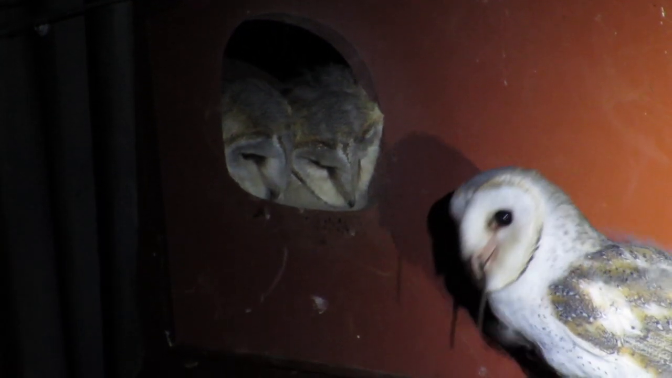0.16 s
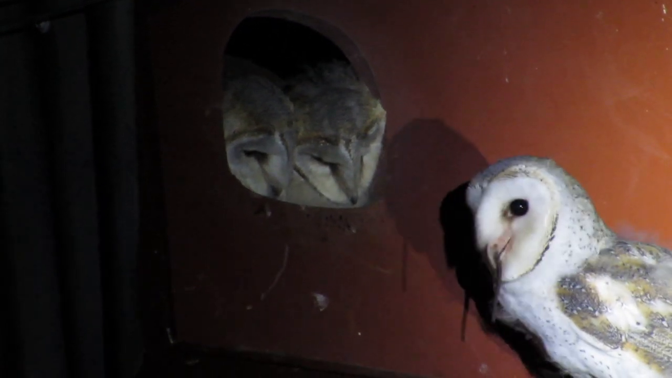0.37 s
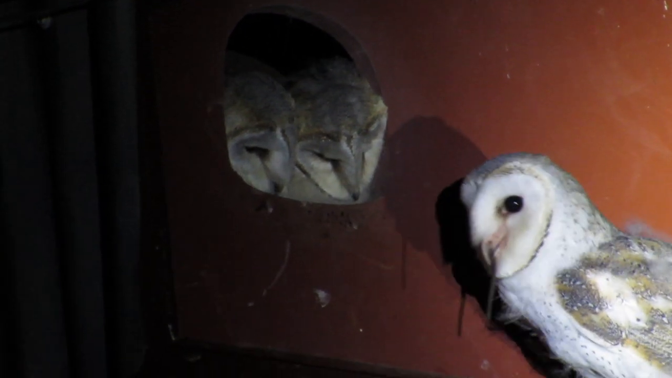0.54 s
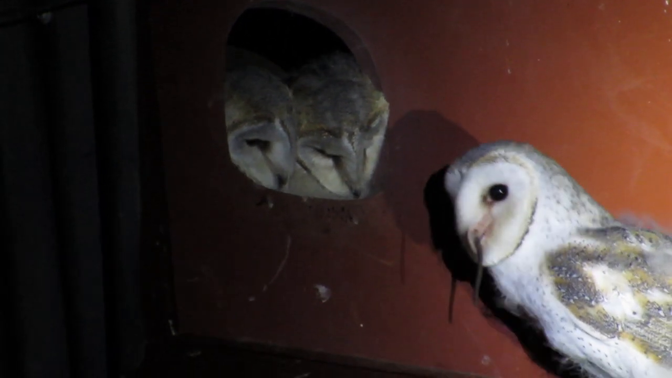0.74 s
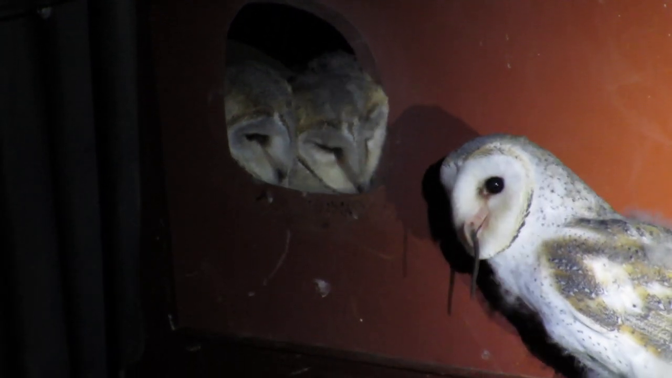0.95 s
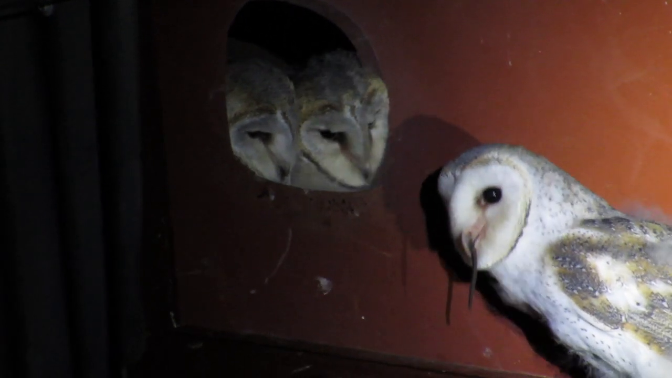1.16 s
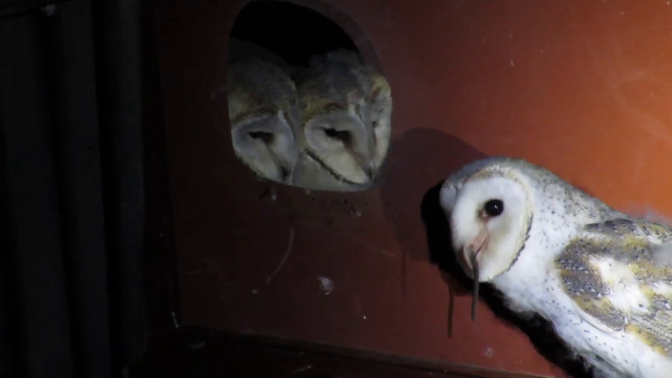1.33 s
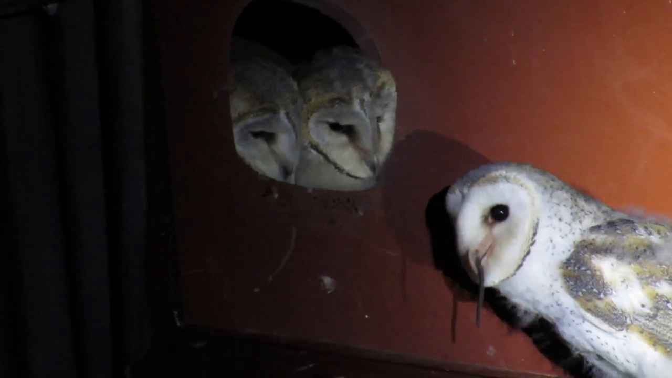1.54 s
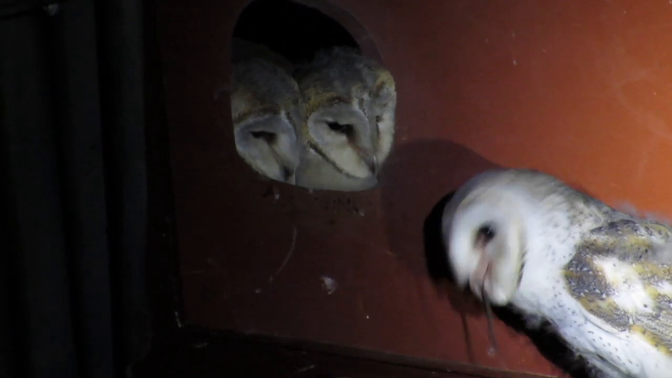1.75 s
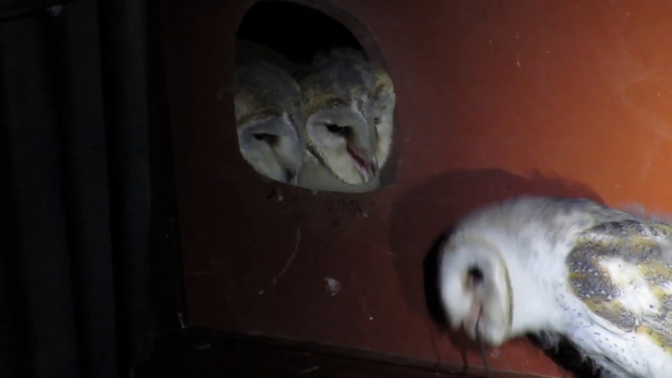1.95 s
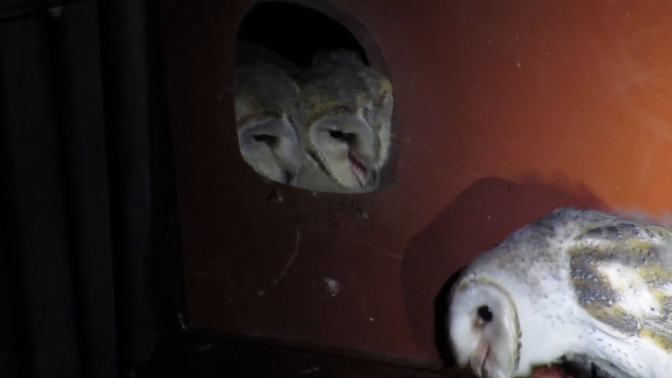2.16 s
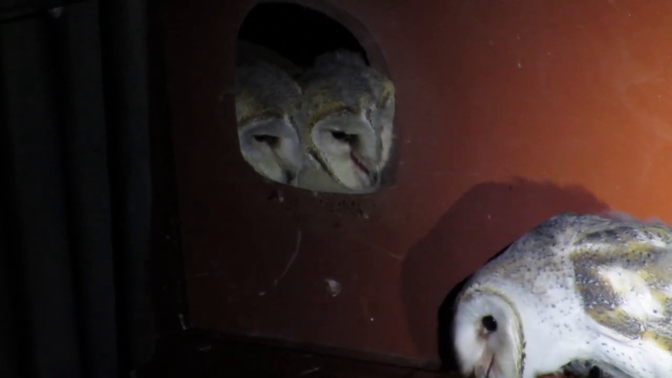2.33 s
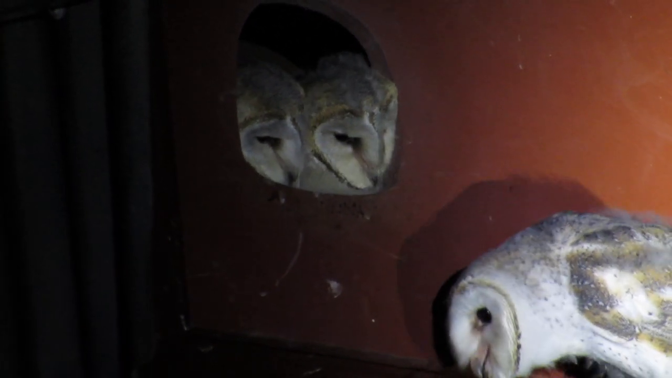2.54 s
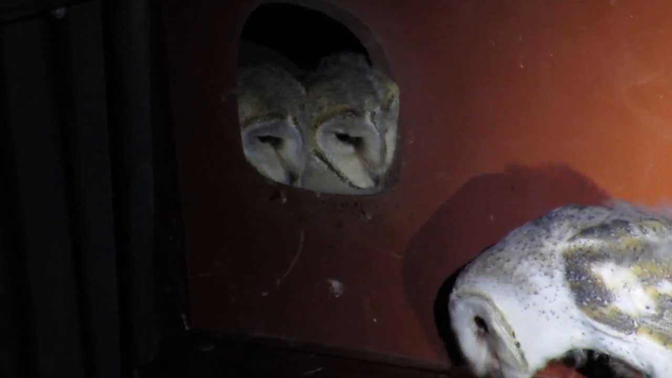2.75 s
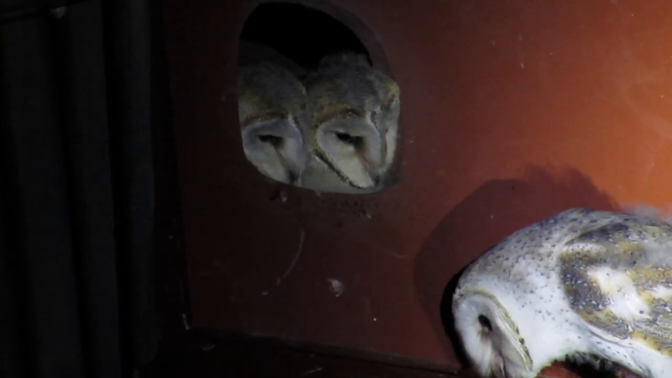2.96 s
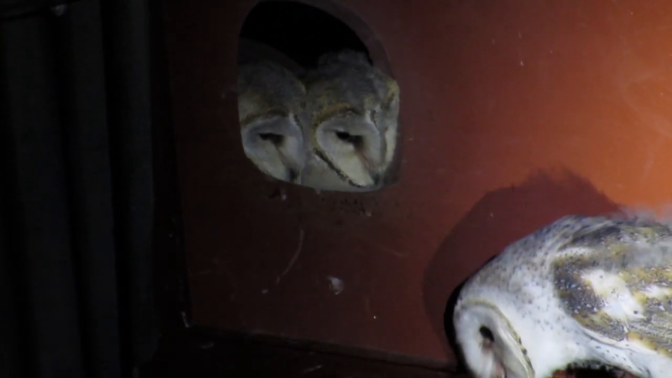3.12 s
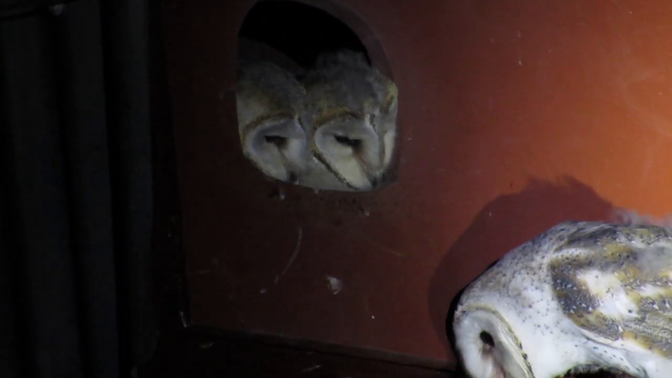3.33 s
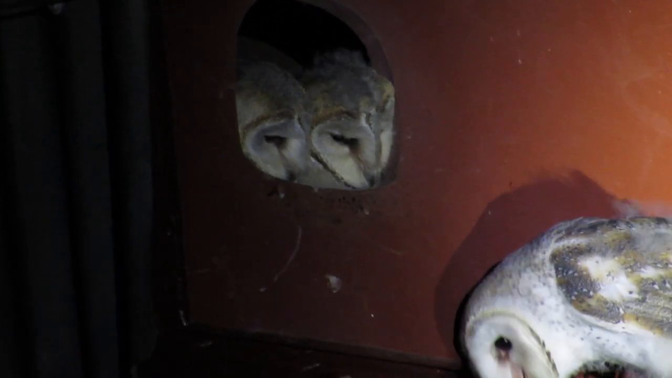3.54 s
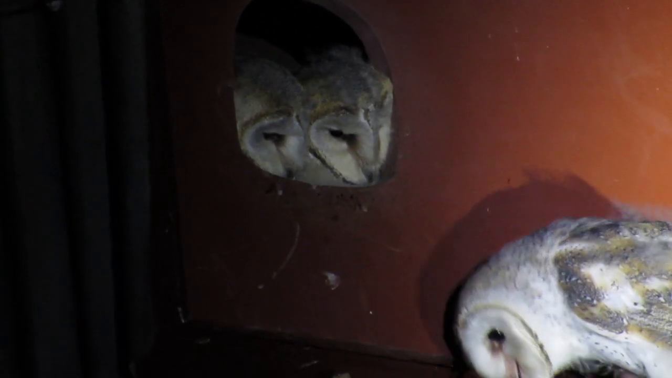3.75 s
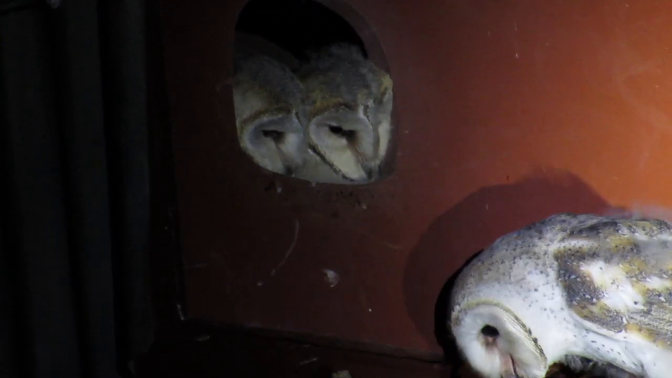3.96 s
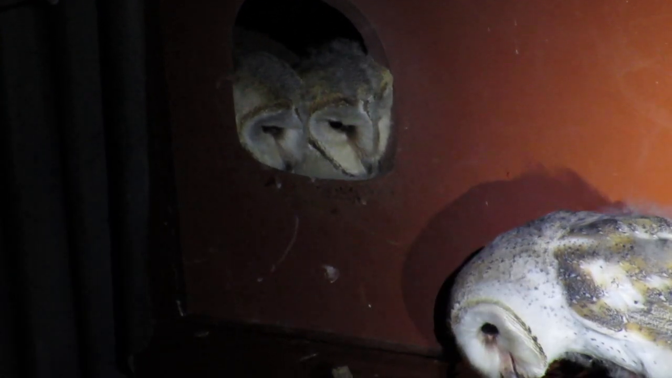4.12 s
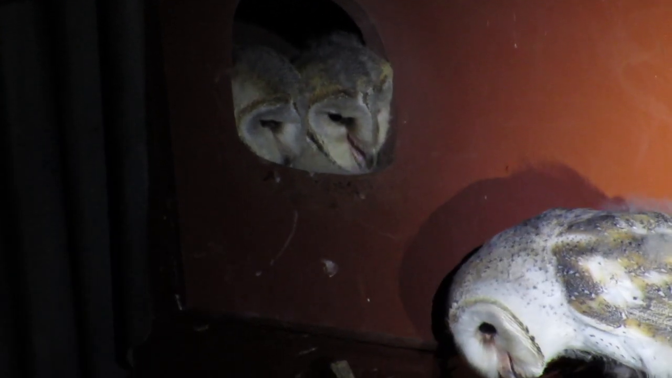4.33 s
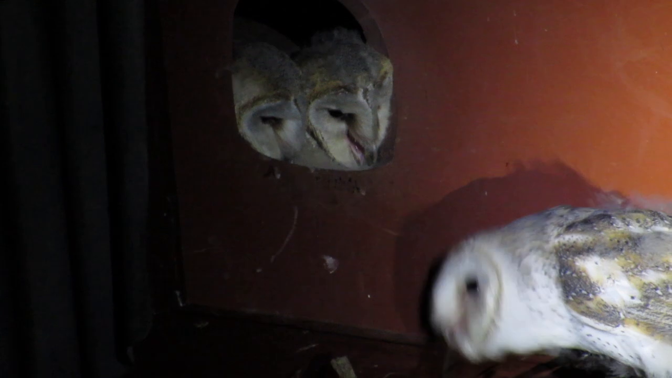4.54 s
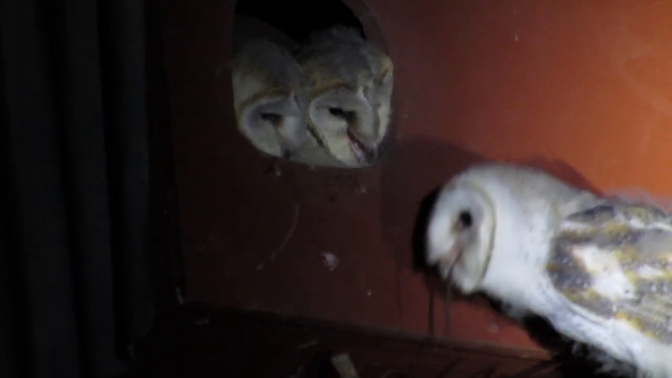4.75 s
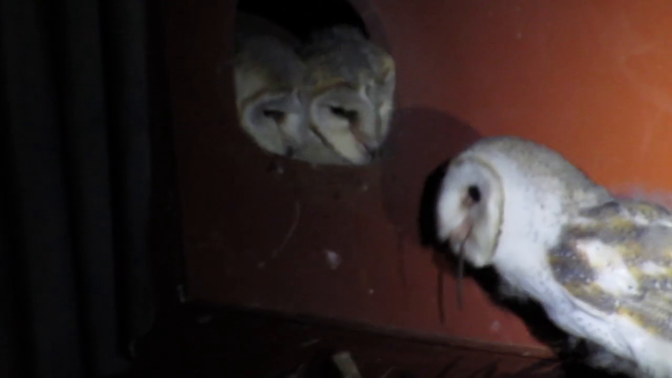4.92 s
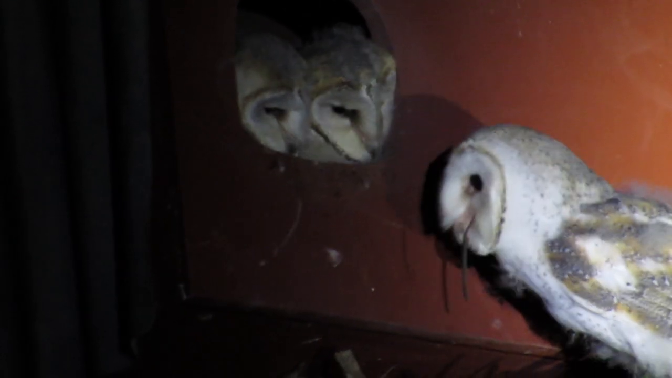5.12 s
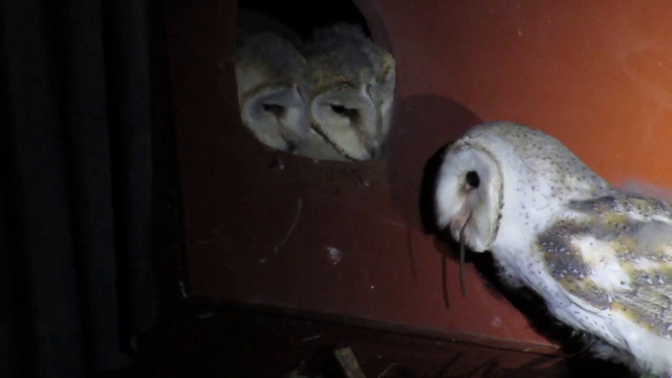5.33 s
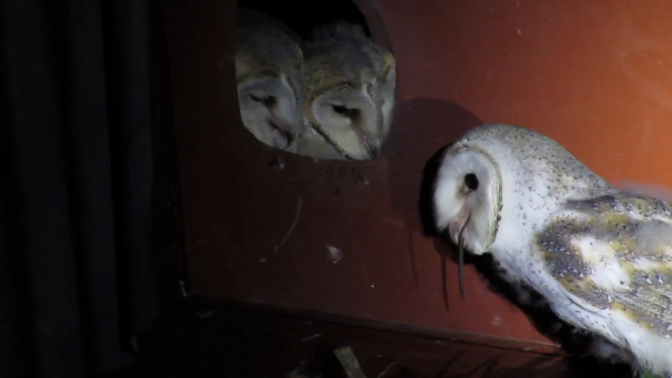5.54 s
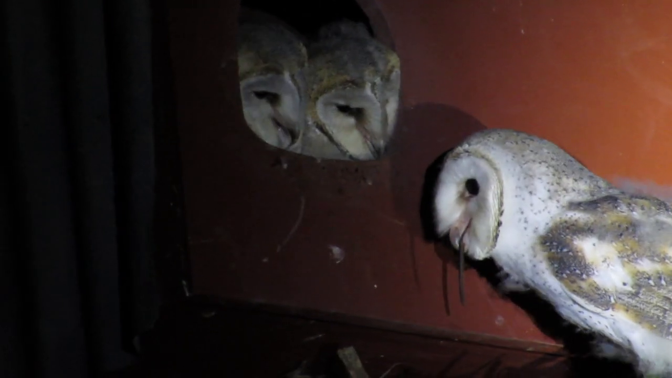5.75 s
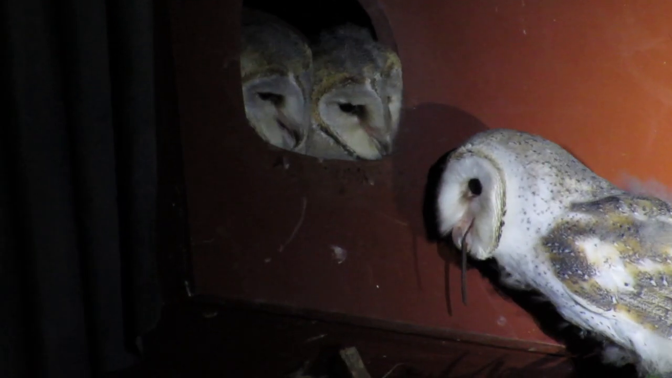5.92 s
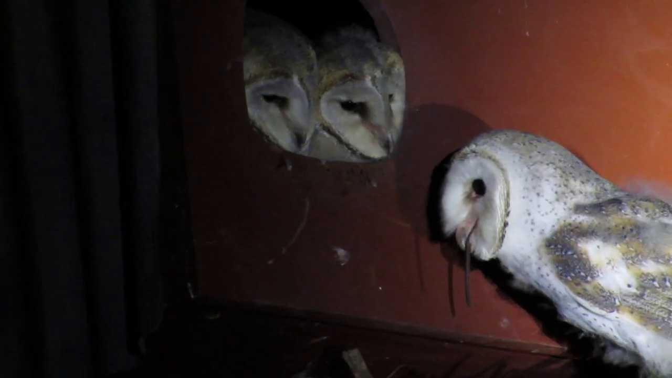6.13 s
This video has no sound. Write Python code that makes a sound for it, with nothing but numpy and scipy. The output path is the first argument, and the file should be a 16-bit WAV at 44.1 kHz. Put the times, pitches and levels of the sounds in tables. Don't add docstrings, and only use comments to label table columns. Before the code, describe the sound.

Two raspy, breathy owl screeches swell and cut off over trilling crickets, with soft wind bumps and small claw ticks on wood.

```python
import sys
import numpy as np
from scipy import signal
from scipy.fft import rfft, irfft
from scipy.io import wavfile
from scipy.ndimage import uniform_filter1d

SR = 44100
rng = np.random.default_rng(int(sys.argv[2]) if len(sys.argv) > 2 else 0)


def digitize_waveform(pressure):
    field = np.atleast_2d(pressure).T
    bounded = np.clip(field, -1, 1)
    quanta = np.round(bounded * 32767).astype(np.int16)
    wavfile.write(sys.argv[1], SR, quanta)


def makeup_ratio(level_db):
    decades = np.asarray(level_db, float) / 20
    return 10 ** decades


N = 276948

# time in seconds, effort in dB, mouth opening from 0 to 1.
SCREECH = [
    (4.312, -65, 0),
    (4.326, -45, 0.06),
    (4.39, -36.5, 0.35),
    (4.49, -30, 0.58),
    (4.62, -25.5, 0.98),
    (4.79, -24, 1.0),
    (4.919, -26, 0.94),
    (5.026, -34, .92),
    (5.073, -59, 0.3),
]
# frequency in Hz, side minus mid in dB.
OWL_SIDE = [(60, 8), (99, -1), (160, -16), (270, 10), (450, 2.5), (740, -2), (1220, -2), (2010, 1.5),
            (3330, -12.5), (5500, -10.5), (9080, -6), (15000, -5)]
FULL_DB = -23.5


def evened(x):
    return x / np.sqrt(np.mean(x ** 2) + 1e-20)


def read(points, hz):
    f, value = np.transpose(points)
    return np.interp(np.log(hz + 1), np.log(f + 1), value)


def add(mix, s, sound):
    at = round(s * SR)
    sound = sound[:, max(-at, 0):]
    part = mix[:, max(at, 0):][:, :sound.shape[1]]
    part += sound[:, :part.shape[1]]


def stereo(mid, side):
    return np.array([mid + side, mid - side])


def noise(gain, size):
    z = rng.standard_normal(gain.shape[::-1] + (2,)).T
    return signal.istft(gain * (z[0] + 1j * z[1]), nperseg=size, noverlap=size * 3 // 4)[1]


def peak(hz, centre_hz, width, db, steep):
    return makeup_ratio(db) ** 2 / (1 + (2 * (hz - centre_hz) / width) ** 2) ** steep


def echoes(x, t60, wet_db, gap=.002):
    t = np.arange(6000) / SR
    signs = rng.choice([-1., 1.], (len(x), 6000))
    taps = signs * (rng.random((len(x), 6000)) < 1 / 20) * (t > gap)
    taps = taps * makeup_ratio(-60 * t / t60)
    taps = makeup_ratio(wet_db) * taps / np.linalg.norm(taps, axis=1, keepdims=True)
    return x + signal.oaconvolve(x, taps, axes=1)[:, :x.shape[1]]


def night():
    # frequency in Hz, density in dB per Hz.
    mid_tone = [(22, -36), (42, -5.5), (66, 9), (110, -5), (300, -12.5), (1080, -24), (3050, -27),
                (3620, -15.5), (4370, -23), (6030, -31.5), (7090, -31), (9790, -16), (11600, -31),
                (13200, -22.5), (15500, -31.5)]
    side_tone = [(15, -37), (69, -4.5), (500, -14), (3050, -23.5), (3620, 6.5), (4350, -47), (5130, -22),
                 (6300, -26), (7800, -11.5), (9270, -28.5), (10900, -11), (13200, -22.5), (14000, -41),
                 (15000, -22)]
    mid_db, side_db = -65, -63
    frames, hz = N // 256 + 5, np.fft.rfftfreq(1024, 1 / SR)[:, None]
    swell = evened(uniform_filter1d(rng.standard_normal(frames), 14))
    gusts_db = 3.5 * swell * np.clip(1 - hz / 150, 0, 1)
    mid = evened(noise(makeup_ratio(read(mid_tone, hz) + gusts_db), size=1024)[:N])
    side = evened(noise(makeup_ratio(read(side_tone, hz) + gusts_db), size=1024)[:N])
    return stereo(makeup_ratio(mid_db) * mid, makeup_ratio(side_db) * side)


def chorus():
    # pitch in Hz, pitch spread in Hz, chirps per second, mid in dB, side in dB.
    far_groups = [(3674, 204, 28, -73.5, -71), (5096, 210, 12, -85.5, -85), (7650, 120, 32, -99, -87.5)]
    # start in seconds, end in seconds, level in dB.
    group_bouts = [
        (0.027, 0.36, 3.5),
        (0.553, 0.863, 3),
        (1.1, 1.298, 1.5),
        (2.48, 3.55, 2.5),
        (3.64, 3.85, 1),
        (4.038, 4.3, 4.5),
        (5.08, 5.287, 7),
        (5.444, 5.858, 3),
        (5.88, 6.08, -0.5),
        (6.18, 6.3, 4),
    ]
    rest_db, bout_edge_s = -5, .055
    groups = []
    for hz, spread, rate, mid_db, side_db in far_groups:
        song, u = np.zeros((2, N)), np.linspace(0, 1, round(.7 * SR / rate))
        for k, (pace, first, tune, phase, breath) in enumerate(rng.uniform(-1.2, 1, (16, 5))):
            pitch = hz + spread * tune - 300 * (u - .5)
            chirp = np.sin(np.pi * u) * np.sin(2 * np.pi * np.cumsum(pitch) / SR)
            starts = np.arange(first, N / SR, 1 / rate / (1 + 0.07 * pace))
            swells = 0.4 + 0.53 * np.sin(2 * np.pi * ((1.2 + 0.43 * breath) * starts + phase))
            for s, level, late in zip(starts, np.maximum(swells, 0), rng.random(400) / 500):
                add(song[k % 2:k % 2 + 1], s + late, level * chirp[None])
        groups.append(stereo(makeup_ratio(mid_db) * evened(song[0]), makeup_ratio(side_db) * evened(song[1])))
    t = np.arange(N) / SR
    db = rest_db + sum((bout_db - rest_db) * (t > start) * (t < end) for start, end, bout_db in group_bouts)
    swell = makeup_ratio(uniform_filter1d(db, round(bout_edge_s * SR)))
    return echoes(groups[0] + swell * groups[1] + groups[2], 0.17, 1.33)


def trills(rows, gap_s, ms, pan_db, per_lead):
    settle_strokes, spread_db, jitter_s = .9, 0.6, .001
    strokes = []
    for first, last, open_db, full_db, lead in rows:
        count = round((last - first) / gap_s) + 1
        db = full_db + (open_db - full_db) * np.exp(-np.arange(count) / settle_strokes)
        late, loud = rng.standard_normal((count, 2)).T
        s = np.linspace(first, last, count) + jitter_s * late
        pan = pan_db + per_lead * lead ** 2
        strokes += [(a, b, ms, pan, lead) for a, b in zip(s, db + spread_db * loud)]
    return strokes


def wing_strokes(rows, top_hz, fall_hz, stretch, octave_db):
    rise_hz_per_ms, sag_bend, edge = 8.4, 2.256, 0.65
    out, chance = np.zeros((2, N)), rng.random((len(rows), 3))
    for (s, db, ms, pan_db, lead), (detune, phase, ripple) in zip(rows, chance):
        u = np.linspace(0, 1, round(stretch * ms * SR / 1000))
        start_hz = top_hz * (1 + .005 * (detune - .5)) + rise_hz_per_ms * (ms - 22)
        pitch = start_hz - fall_hz * ms / 22 * u ** sag_bend
        turn = 2 * np.pi * (np.cumsum(pitch) / SR + phase)
        ahead = np.array([[lead / 2], [-lead / 2]])
        shape = np.sin(np.pi * u) ** edge * (1 + .2 * np.sin(2 * np.pi * (2.5 * u + ripple)))
        to_each = makeup_ratio(db + 3 + np.array([[pan_db / 2], [-pan_db / 2]])) / max(np.cos(lead / 2), .45)
        octave = makeup_ratio(octave_db - (db + 68.0) / 2) * np.sin(2 * turn + ahead)
        add(out, s - len(u) / SR / 2, to_each * shape * (np.sin(turn + ahead) + octave))
    return out


def near_crickets():
    # first stroke in seconds, last stroke in seconds,
    # opening level in dB, full level in dB, left lead in radians.
    fast_trills = [
        (0.019, 0.307, -53.5, -53.5, -1.4),
        (0.555, 0.878, -60, -54, -1.5),
        (1.649, 1.684, -56.5, -51, -1.0),
        (2.424, 2.537, -48, -51.5, -1.5),
        (2.726, 3.111, -53, -51.5, -1.66),
        (3.314, 3.636, -56.5, -55.5, -2),
        (5.047, 5.227, -46, -48, 1.05),
        (5.271, 5.271, -48.5, -50, 1.3),
        (5.467, 5.895, -55, -48.5, 0.6),
        (6.099, 6.275, -50, -47.5, -0.2),
    ]
    slow_trills = [
        (1.18, 1.585, -59, -54.5, -1.1),
        (4.048, 4.334, -61, -52.5, -2),
    ]
    far_trills = [
        (0.321, 0.537, -63.5, -64.5, -2),
        (1.041, 1.4, -66, -62.5, -2.3),
        (2.566, 2.673, -66, -58.5, -2.0),
        (3.146, 3.184, -62.5, -59, -2),
        (3.665, 3.855, -58, -59.5, 1.1),
        (5.319, 5.434, -67, -72, -0.5),
        (5.962, 6.039, -63, -69, -1.5),
    ]
    deep_trills = [
        (0.54, 0.61, -68, -69, 2.4),
        (5.232, 5.415, -64, -75, 3.1),
    ]
    # start in seconds, level in dB, left lead in radians.
    high_phrases = [
        (0.402, -61, 0.77),
        (1.515, -60, .95),
        (2.615, -65, 1.45),
    ]
    phrase_s = (0, 0.097, .355)
    fast_gap_s, slow_gap_s = .0358, .069
    fast_ms, slow_ms, far_ms, high_ms = 22, 31, 18, 33
    near_pan_db, pan_per_lead = 2, -0.37
    low = trills(fast_trills, fast_gap_s, fast_ms, near_pan_db, pan_per_lead)
    low += trills(far_trills, fast_gap_s, far_ms, -2.5, 0)
    low += trills(slow_trills, slow_gap_s, slow_ms, near_pan_db, pan_per_lead)
    deep = trills(deep_trills, fast_gap_s, far_ms, 1.0, 0)
    high = [(s + later, db, high_ms, 0, lead) for s, db, lead in high_phrases for later in phrase_s]
    out = wing_strokes(low, 4040, 399, 1.25, -20)
    out = out + wing_strokes(deep, 3680, 330, 0.83, -40)
    return out + wing_strokes(high, 5056, 215, 1.32, -34)


def buzz():
    # start in seconds, end in seconds, start level in dB, end level in dB, start pitch in Hz.
    buzz_bouts = [
        (0.4, 1.685, -86.5, -76, 7280),
        (3.001, 4.323, -76.5, -70.5, 7270),
        (5.883, 6.3, -84, -81, 7230),
    ]
    pulses_per_s, cold_per_s = 84.3, 4.0
    warm_s, cold_db, climb_hz_per_s = 0.11, -8, 55
    out = np.zeros((2, N))
    for start, end, start_db, end_db, start_hz in buzz_bouts:
        t = np.arange(0, end - start, 1 / SR)
        cold = np.exp(-t / warm_s)
        db = start_db + (end_db - start_db) * t / t[-1] + cold_db * cold ** 2
        hz = start_hz + climb_hz_per_s * t
        u = (np.cumsum(pulses_per_s - cold_per_s * cold) / SR + 0.14) % 1
        pulse = np.sin(np.pi * np.clip(u / .5, 0, 1))
        turn = 2 * np.pi * np.cumsum(hz + 150 * (.25 - u)) / SR + np.array([[.55], [-.55]])
        add(out, start, makeup_ratio(db + 3.0) * evened(pulse * np.sin(turn)) * signal.windows.tukey(len(t), .02))
    return out


def wind_bumps():
    # time in seconds, peak in dB, frequency in Hz, length in cycles.
    gusts = [
        (1.47, -69.5, 35, 1.6),
        (2.23, -52, 39.5, 1.7),
        (2.592, -53.5, 47, 2.8),
        (2.70, -59.5, 49.3, 4.3),
        (2.861, -45, 47.2, 0.92),
        (2.904, -48, 40.5, 2.2),
        (3.171, -57.5, 58, 3),
        (3.30, -62, 27.8, 3.5),
        (3.819, -47.5, 50, 1.7),
    ]
    out = np.zeros((2, N))
    t = np.arange(-.15, .15, 1 / SR)
    for s, db, hz, cycles in gusts:
        envelope = np.exp(-(2 * t * hz / cycles) ** 2)
        add(out, s - .15, makeup_ratio([[db], [db - .5]]) * envelope * np.cos(2 * np.pi * hz * t))
    return out


def throat(t):
    s, effort_db, mouth = np.transpose(SCREECH)
    return np.interp(t, s, effort_db), np.clip(np.interp(t, s, mouth), 0, 1.2)


def owl():
    # width in Hz, level in dB.
    throat_modes = [(200, -3.5), (310, -0.16)]
    # frequency in Hz, width in Hz, level in dB.
    beak_modes = [(3980, 850, -46), (5470, 1300, -9.5), (5820, 2360, -9), (7500, 660, -13),
                  (8910, 880, -10), (9590, 1550, -8.5), (11400, 1300, -16), (11610, 350, -5),
                  (12400, 310, -8), (12950, 670, -10), (12900, 340, -42)]
    # frequency in Hz, left minus right in dB.
    balance = [(60, 47), (180, 7), (550, 9), (1650, -7.5), (4970, 0.7), (9000, 1.5), (15000, 4)]
    low_shut_hz, low_open_hz, high_shut_hz, high_open_hz = 2660, 3610, 4760, 5810
    high_from, high_span = 0.16, 0.6
    s = np.transpose(SCREECH)[0]
    t, hz = np.arange(s[0], s[-1], 128 / SR), np.fft.rfftfreq(512, 1 / SR)[:, None]
    effort_db, mouth = throat(t)
    low_hz = low_shut_hz + (low_open_hz - low_shut_hz) * mouth
    jump = np.sin(np.pi / 2 * np.clip((mouth - high_from) / high_span, 0, 1)) ** 2
    high_hz = high_shut_hz + (high_open_hz - high_shut_hz) * jump
    bright_db = -18.5 + 0.19 * (effort_db - FULL_DB) + 6.5 * mouth
    power = sum(peak(hz, f, *mode, 1.24) for f, mode in zip((low_hz, high_hz), throat_modes))
    power = power * makeup_ratio(np.where(hz < 4000, (low_hz - 3600) / 160, 0)) ** 2
    power = power + sum(peak(hz, *mode, 1.5) for mode in beak_modes)
    power = power * makeup_ratio((bright_db + 7) * np.clip((hz - 6500) / 5500, 0, 1.5)) ** 2
    power = power * peak(hz, np.maximum(hz, .95 * low_hz), 640, 0, 1.6)
    clumps = uniform_filter1d(rng.standard_normal(power.shape[::-1]).T, size=5, axis=0)
    clumps = uniform_filter1d(clumps, size=4, axis=1)
    gain = np.sqrt(power / power.mean(0)) * makeup_ratio(1.0 * evened(clumps))
    air, stray = noise(gain, size=512), noise(gain, size=512)
    rough = rng.standard_normal(len(t) * 128 + 512)[:len(air)]
    flutter = makeup_ratio(0.45 * evened(uniform_filter1d(uniform_filter1d(rough, 150), 150)))
    level = makeup_ratio(throat(np.arange(len(air)) / SR + s[0])[0]) * flutter / air.std()
    detour = rng.standard_normal(600) * makeup_ratio(-60 * np.arange(600) / SR / .014)
    side = 0.99 * signal.oaconvolve(air, detour / np.linalg.norm(detour))[:len(air)] + 0.52 * stray
    call = echoes(np.pad(np.array([air, side]) * level, ((0, 0), (0, 6000))), .11, -7.5)
    size = call.shape[1]
    hz = np.fft.rfftfreq(size, 1 / SR)
    call[1] = irfft(rfft(call[1]) * makeup_ratio(read(OWL_SIDE, hz)), size)
    pan_db = read(balance, hz) / 2
    return s[0], makeup_ratio(-0.85) * irfft(rfft(stereo(*call)) * makeup_ratio([pan_db, -pan_db]), size)


def nest_box():
    # frequency in Hz, width in Hz, level in dB.
    box_modes = [(300, 1000, -7.5), (700, 540, -2.5), (1550, 430, -15.5), (2128, 570, 0)]
    boom_db, boom_share, margin_s = -58, 0.63, .3
    lead_db_per_s, linger_db_per_s = 286, 159
    start = SCREECH[0][0] - margin_s
    t = np.arange(start, SCREECH[-1][0] + margin_s, 128 / SR)
    hz = np.fft.rfftfreq(512, 1 / SR)[:, None]
    inside = (t > SCREECH[0][0]) & (t < SCREECH[-1][0])
    db = np.where(inside, boom_db + boom_share * (throat(t)[0] - FULL_DB), -200)
    db = np.maximum.accumulate(db + linger_db_per_s * t) - linger_db_per_s * t
    db = np.maximum.accumulate((db - lead_db_per_s * t)[::-1])[::-1] + lead_db_per_s * t
    power = sum(peak(hz, *mode, 3) for mode in box_modes)
    gain = np.sqrt(power / power.mean()) * makeup_ratio(db)
    mid, side = noise(gain, size=512), noise(gain * makeup_ratio(read(OWL_SIDE, hz)), size=512)
    return start, makeup_ratio(-20) * makeup_ratio([[1.1], [-1.1]]) * stereo(mid, side)


def claw_ticks():
    # (left
    # gains and right loses this much, on top of a fixed 8 dB towards the left).
    taps_on_wood = [
        (4.05, -61, 890, 18, 0),
        (4.478, -46, 1250, 18, -2),
        (5.128, -50.5, 1330, 13, -2),
        (5.137, -68, 1700, 17, 8),
        (5.594, -60.5, 1550, 36, 2),
        (5.599, -61, 2000, 20, 0),
        (5.722, -52.5, 1020, 8.7, 3.5),
        (5.741, -61.5, 1110, 22, 1),
    ]
    out = np.zeros((2, N))
    t = np.arange(0, .05, 1 / SR)
    for s, db, hz, t60_ms, pan_db in taps_on_wood:
        ring = makeup_ratio(db - 60000 * t / t60_ms) * np.sin(2 * np.pi * hz * t) * np.minimum(t / 0.00047, 1)
        add(out, s, makeup_ratio([[pan_db + 2], [-pan_db - 6]]) * ring)
    return out


def scene():
    insects = echoes(near_crickets() + buzz(), .12, -12, gap=.004)
    out = night() + chorus() + insects + wind_bumps() + claw_ticks()
    earlier = 115878 / SR
    for s, sound in (owl(), nest_box()):
        add(out, s - earlier, sound)
        add(out, s, sound)
    return out


def band_limit(x):
    return signal.sosfilt(signal.butter(12, 15610, fs=SR, output="sos"), x)


def record(dry):
    return band_limit(dry)


dry = scene()
out = record(dry)
digitize_waveform(out)
```